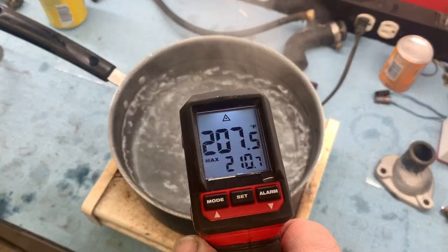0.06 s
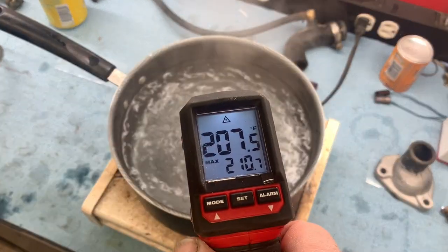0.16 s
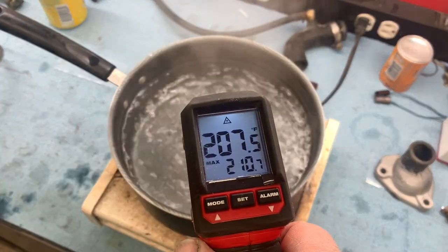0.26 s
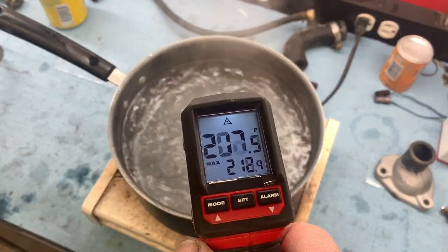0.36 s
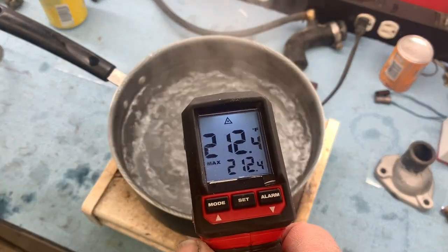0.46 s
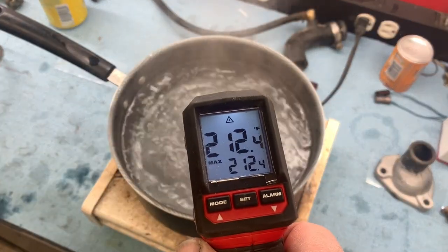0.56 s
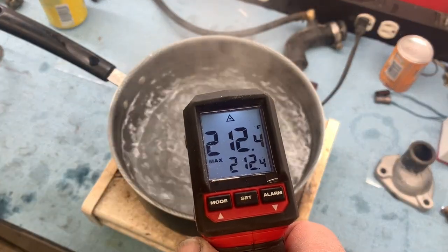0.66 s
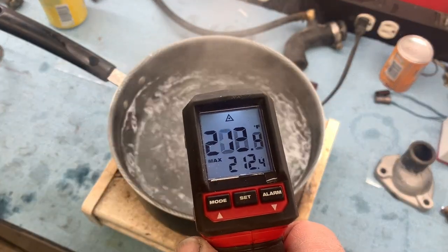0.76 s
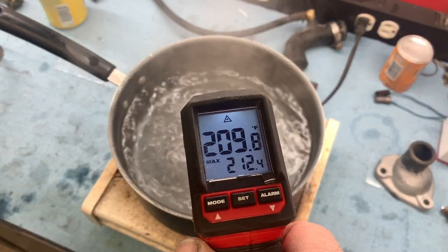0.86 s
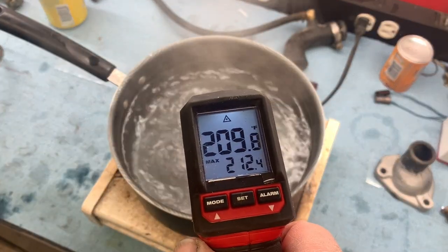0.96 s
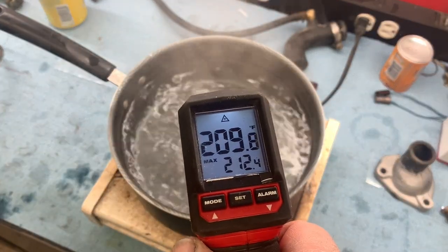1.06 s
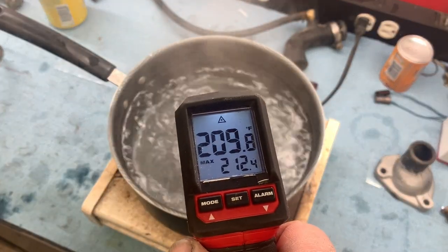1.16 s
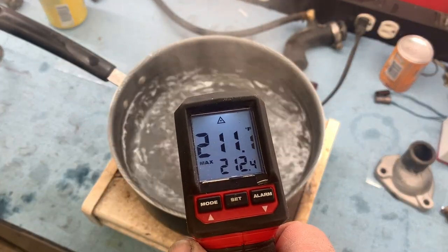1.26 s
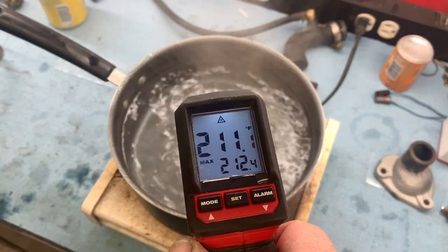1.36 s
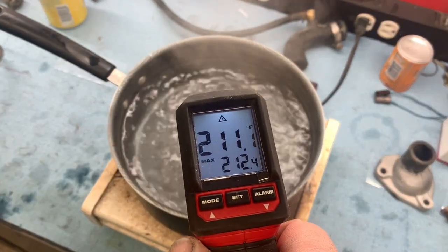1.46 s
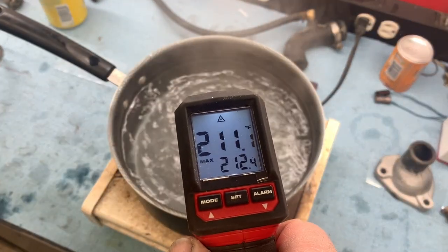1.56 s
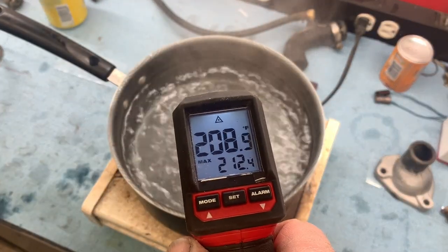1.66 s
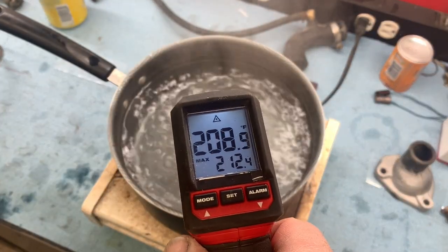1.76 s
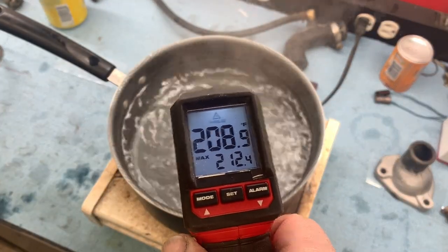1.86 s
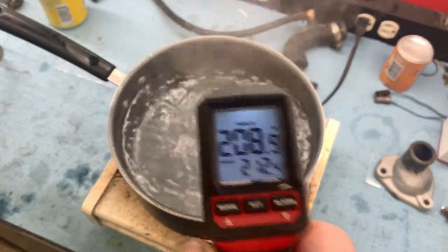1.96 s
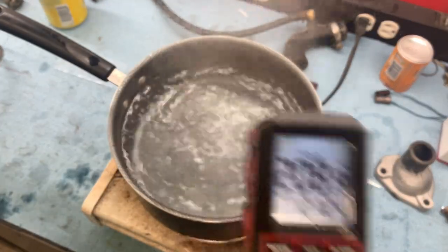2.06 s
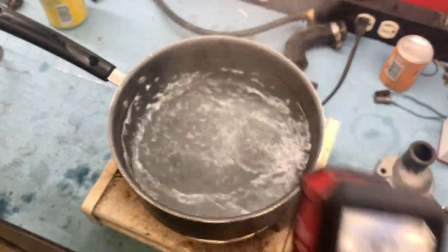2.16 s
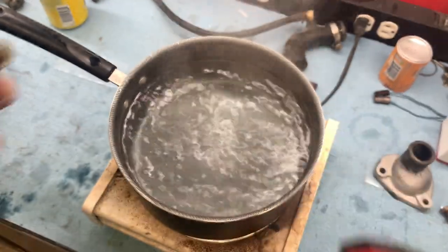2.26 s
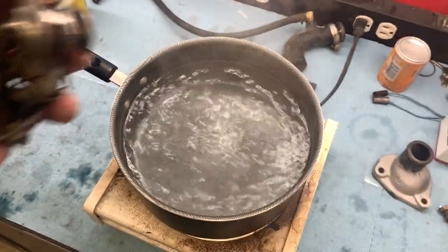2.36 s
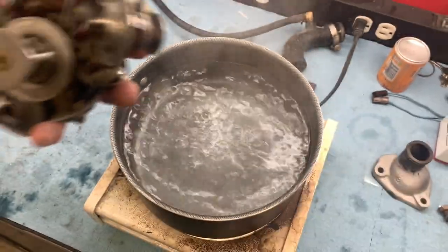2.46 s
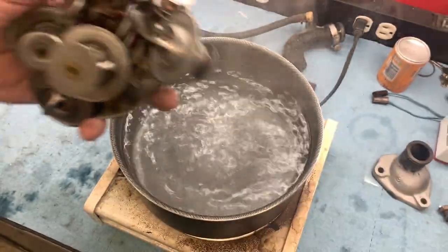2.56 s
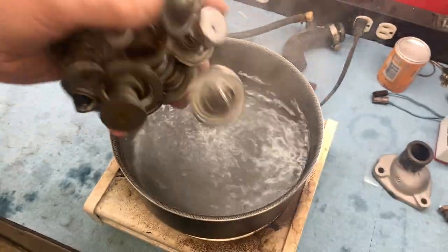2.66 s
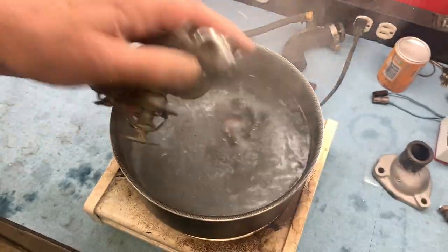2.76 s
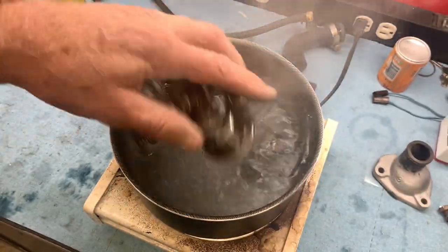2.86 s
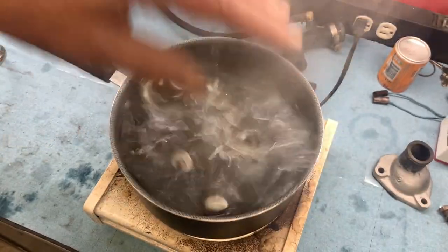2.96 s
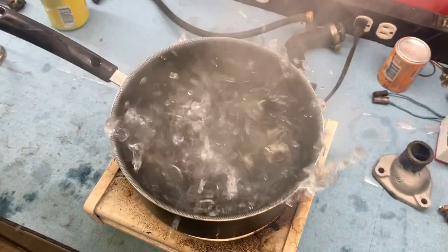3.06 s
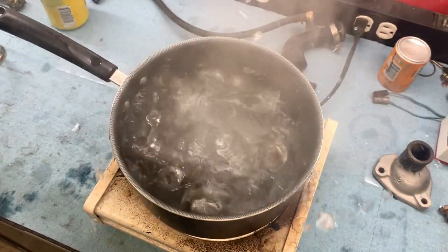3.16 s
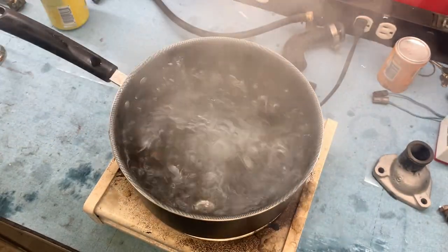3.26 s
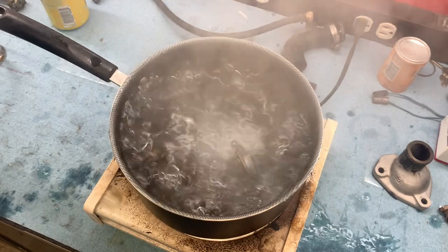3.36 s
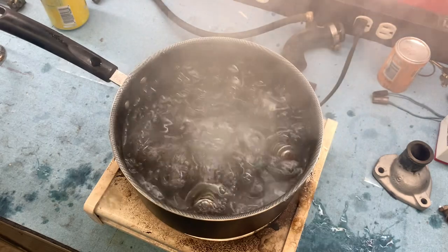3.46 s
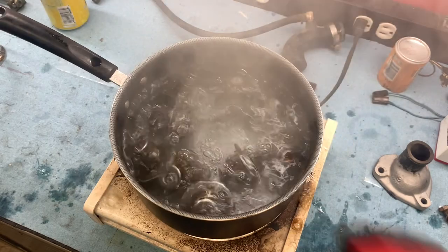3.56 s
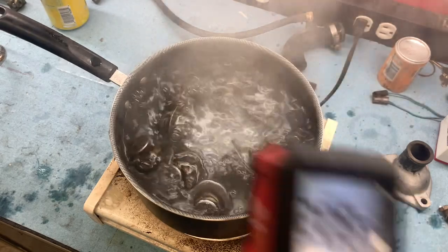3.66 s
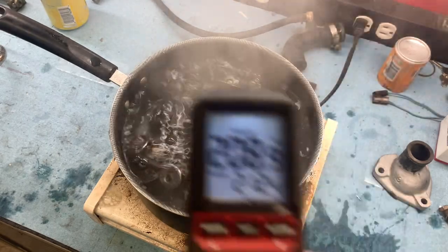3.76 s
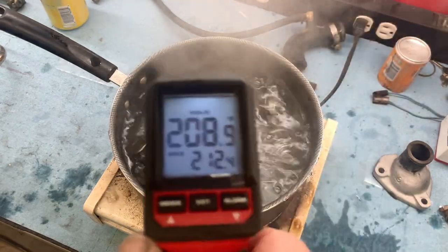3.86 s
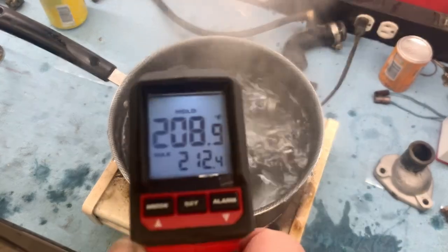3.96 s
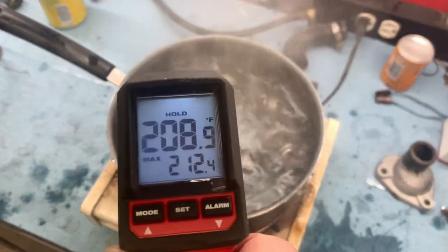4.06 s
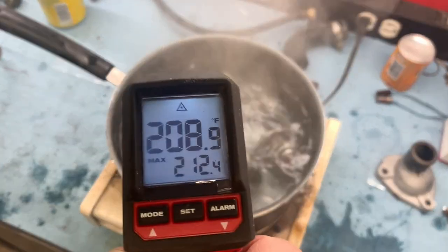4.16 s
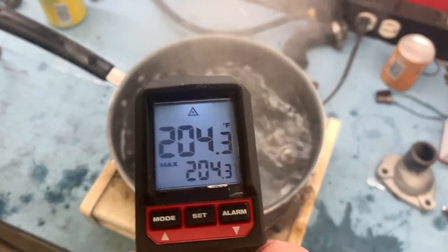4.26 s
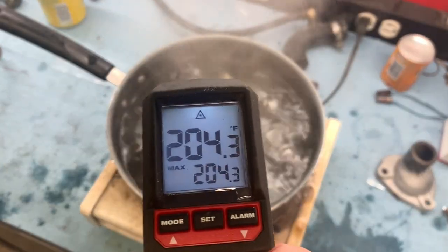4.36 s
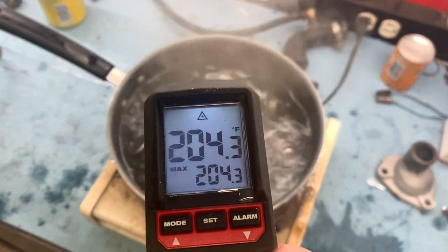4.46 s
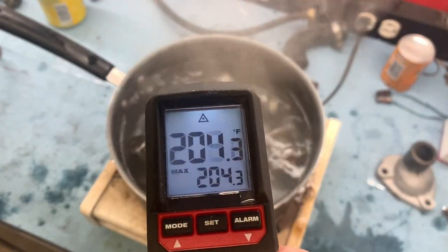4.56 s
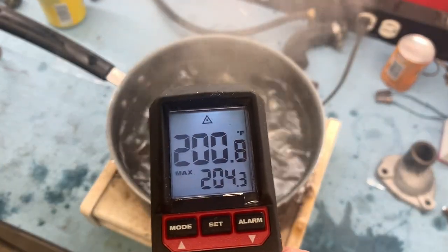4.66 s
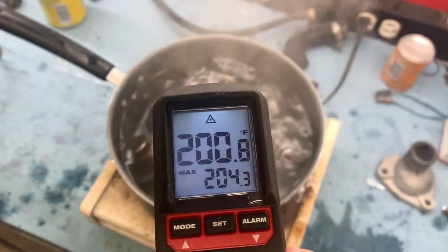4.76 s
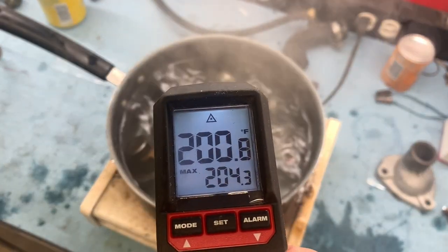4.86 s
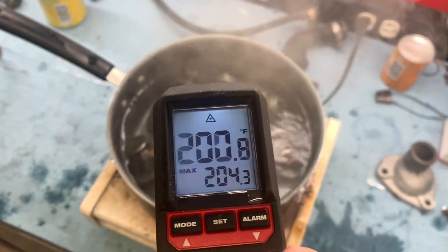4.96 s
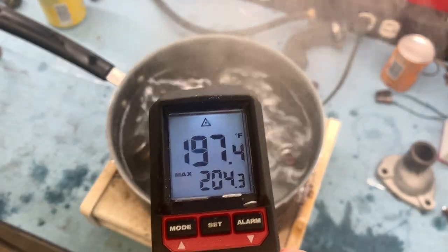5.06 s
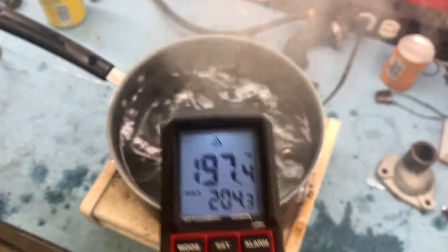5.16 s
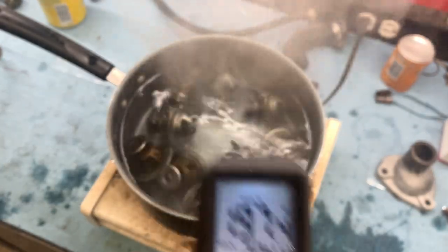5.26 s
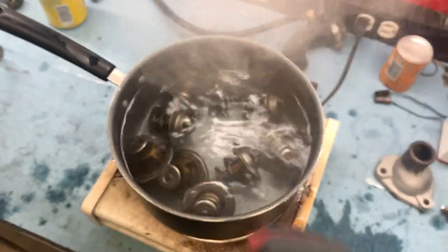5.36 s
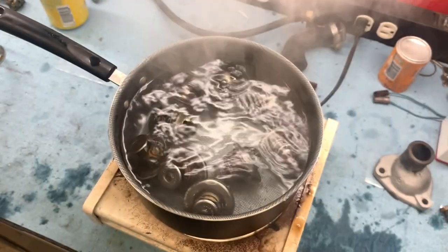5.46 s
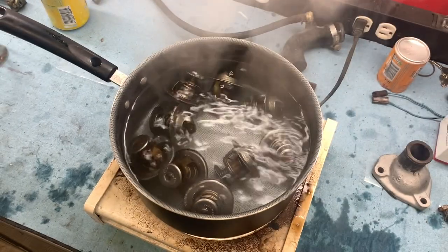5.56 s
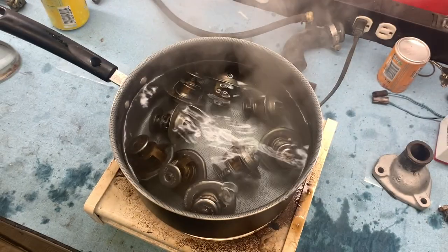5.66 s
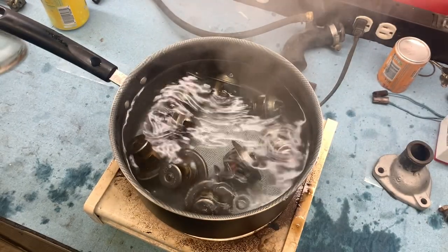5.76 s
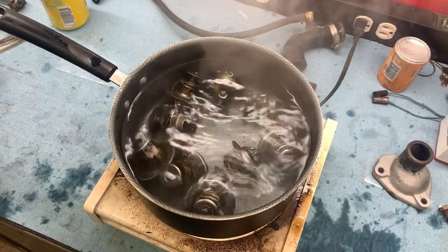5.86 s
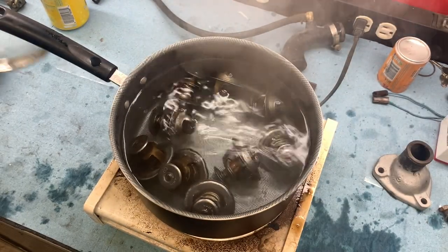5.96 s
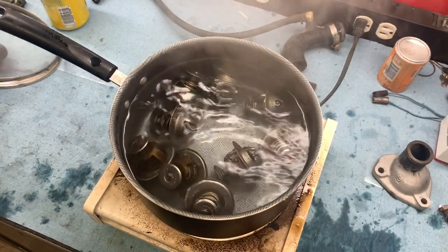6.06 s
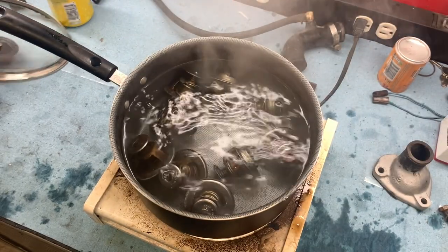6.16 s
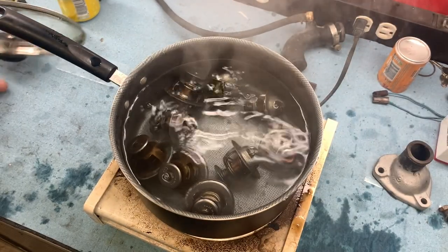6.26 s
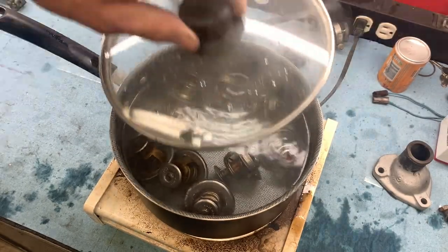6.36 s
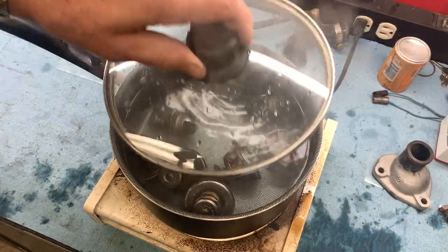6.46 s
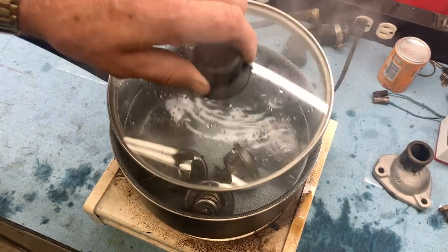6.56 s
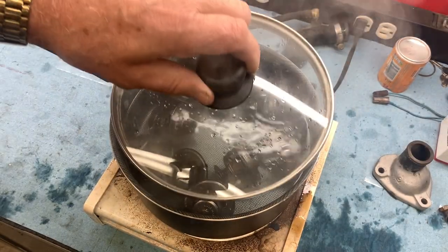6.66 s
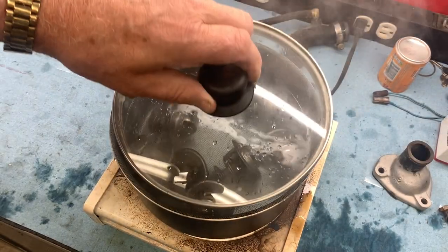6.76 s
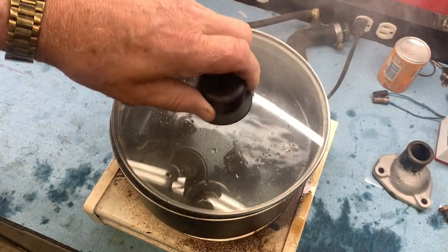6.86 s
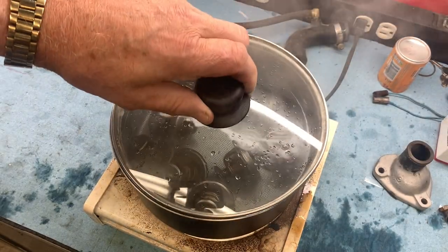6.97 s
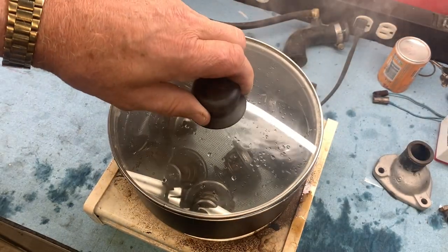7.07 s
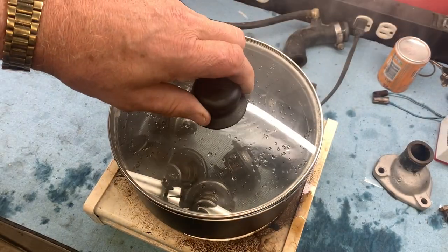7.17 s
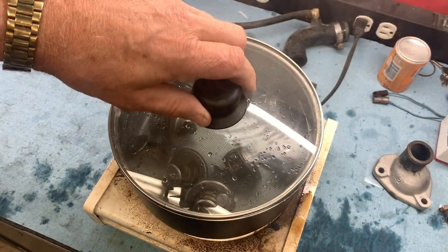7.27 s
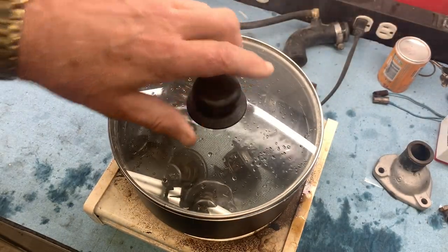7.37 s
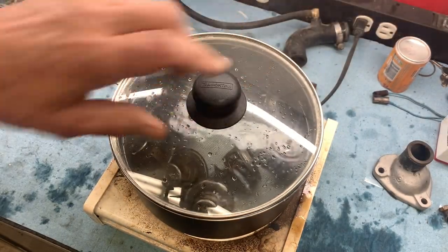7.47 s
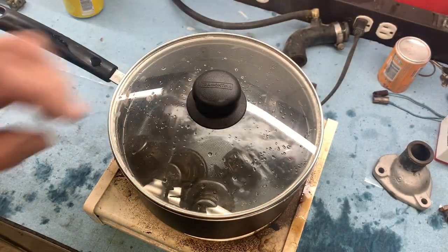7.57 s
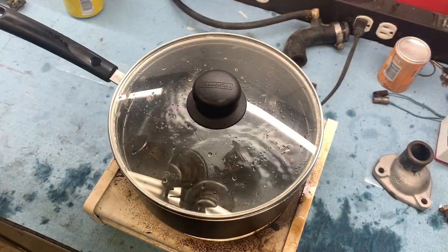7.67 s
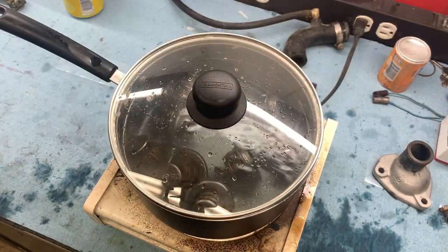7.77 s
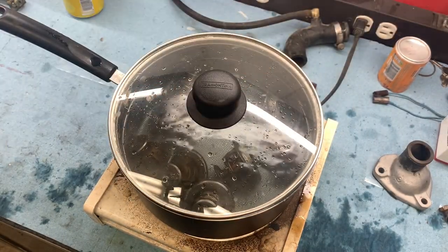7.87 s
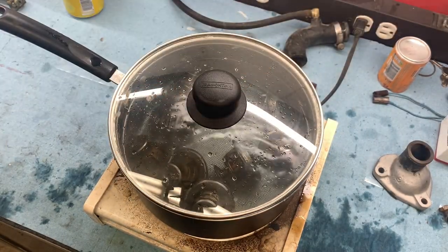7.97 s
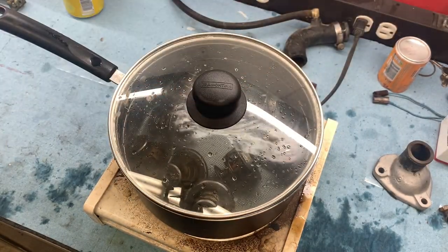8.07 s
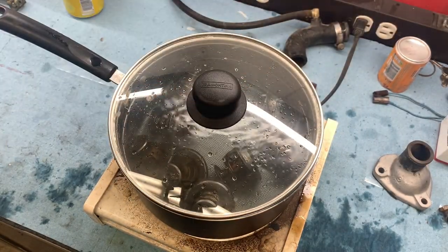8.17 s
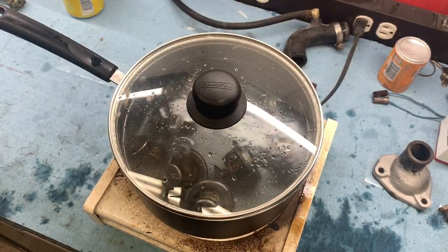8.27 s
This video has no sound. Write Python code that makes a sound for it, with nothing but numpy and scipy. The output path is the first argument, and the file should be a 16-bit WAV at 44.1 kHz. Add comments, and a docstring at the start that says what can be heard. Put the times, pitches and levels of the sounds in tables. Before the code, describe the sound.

A saucepan simmers softly on a hot plate, close by, with an uneven low throb over workshop ventilation and a faint electrical hum. A plastic thermometer trigger clicks at about 1.8 seconds. From 2.3 seconds metal parts rub and clink in a hand. Between 2.8 and 3.2 they splash into the water and clatter on the pan's bottom, the loudest moment, with plops, a gurgle and a fizz that slowly fades. The thermometer clicks again near 4 and 5.3 seconds. The pan's wall rings thinly, steam bubbles collapse in small rasps, and low glugs follow from 5.5 to 6.2. Spilled water sizzles on the plate from around 5.4 seconds. At 6.1 a glass lid scrapes off the bench with a brief ring, then knocks dully onto the pan at about 7. Droplets spit and sputter until the end, just after 8 seconds.

```python
"""In a workshop, a saucepan simmers and throbs on a hot plate, close under a hand-held phone.
A thermometer's plastic trigger clicks. Metal parts clink in a hand and drop into the pan, where
the air they drag under plops, gurgles and fizzes. Steam bubbles collapse and glug, and water that
slops over hisses and spits on the plate. A glass lid is picked up from the bench and set on the pan.
Ventilation and a faint electrical hum go on behind it all."""
import sys
import numpy as np
from scipy import signal
from scipy.fft import rfft, irfft
from scipy.io import wavfile
from scipy.ndimage import uniform_filter1d

SR = 44100
rng = np.random.default_rng(int(sys.argv[2]) if len(sys.argv) > 2 else 0)


def to_wav(sig):
    """Store sig (one row per channel, or 1-D mono) as 16-bit WAV at the path in sys.argv[1].

    Samples outside -1..1 are clipped; the rate is SR.
    """
    pcm = np.clip(np.atleast_2d(sig), -1, 1) * 32767
    pcm = np.round(pcm).astype(np.int16)
    wavfile.write(sys.argv[1], SR, pcm.T)  # frames by channels


N = 366912
T = np.arange(N) / SR  # the time of every sample, in seconds
HIT_T = T[:SR // 2]  # half a second, for one short sound
FREQS_HZ = np.fft.rfftfreq(N, 1 / SR)


def undb(db):
    """Turn decibels into a number to multiply by."""
    return 10 ** (np.asarray(db) / 20)


def unit(x):
    """Scale a sound so its average strength (rms) is 1."""
    return x / np.sqrt(np.mean(x ** 2))


def curves(rows):
    """Join a table's points with straight lines through time, one curve for each value column."""
    times_s, *columns = np.transpose(rows)
    return [np.interp(T, times_s, column) for column in columns]


def add(track, start_s, sound):
    """Mix a sound into a track at the given time."""
    start = int(start_s * SR)
    track[start:start + len(sound)] += sound[:N - start]


def colour(x, points):
    """Shape a sound's bass and treble by (pitch_hz, level_db) points; the result has strength 1."""
    hz, db = np.transpose(points)
    freqs = np.fft.rfftfreq(len(x), 1 / SR) + 1
    gain = undb(np.interp(np.log(freqs), np.log(hz), db))
    return unit(irfft(rfft(x) * gain, len(x)))


def resonate(x, hz, width_hz):
    """Make a sound ring at one pitch; a narrower width rings longer."""
    hz = min(hz, SR / 2 - 1000)
    sharpness = hz / min(width_hz, SR / np.pi)
    return signal.lfilter(*signal.iirpeak(hz, sharpness, fs=SR), x)


def wander(per_s):
    """A smooth random wobble of strength 1 that heads for a new value per_s times a second."""
    step = max(int(SR / per_s), 1)
    held = np.repeat(rng.standard_normal(N // step + 1), step)[:N]
    return unit(uniform_filter1d(uniform_filter1d(held, step), step))


def swell(peak_s, rise_s, fade_s):
    """A level that grows to 1 at peak_s and dies away; with an endless fade it stays at 1."""
    return np.exp(np.minimum((T - peak_s) / rise_s, (peak_s - T) / fade_s))


def pops(per_s, spread_db):
    """Tiny clicks of uneven size at random moments, like bursting bubbles."""
    size = undb(spread_db * np.minimum(rng.exponential(size=N), 2 * np.pi))
    happens = rng.random(N) < per_s / SR
    return unit(happens * size * rng.choice([-1, 1], N))


def grit(spread_db):
    """Rough noise for one short sound, made of grains under a millisecond long."""
    grain_samples = 32
    sizes = undb(spread_db * rng.uniform(-0.79, 1, len(HIT_T) // grain_samples + 1))
    return np.repeat(sizes, grain_samples)[:len(HIT_T)] * rng.standard_normal(len(HIT_T))


def blows(rows, tones, thud_colour, crack_colour, thud_db, thud_s, ring_db):
    """Each blow thuds, cracks and rings the object; a tone falls by 60 dB over its ring_s."""
    out = np.zeros(N)
    hz, tone_db, ring_s = np.transpose(tones)[:, :, None]
    for start_s, body_db, crack_db, crack_s in rows:
        # every spot that is struck rings a little differently
        spot, detune, side = rng.standard_normal((3, len(hz), 1))
        gain = undb(tone_db + 1.1 * spot) * np.sign(side)
        waves = np.sin(2 * np.pi * hz * (1 + 0.012 * detune) * HIT_T)
        fade = np.exp(-np.log(1000) * HIT_T / ring_s)
        ring = np.sum(gain * waves * fade, axis=0) / np.linalg.norm(gain)
        thud = colour(rng.standard_normal(len(HIT_T)), thud_colour) * np.exp(-HIT_T / thud_s)
        crack = colour(grit(spread_db=8.0), crack_colour) * np.exp(-HIT_T / crack_s)
        body = undb(ring_db) * ring + undb(thud_db) * thud
        add(out, start_s, undb(body_db) * body + undb(crack_db) * crack)
    return out


# The deep rush of the ventilation: pitch_hz, level_db
VENT_COLOUR = [(20, -3), (50, 8), (80, 6), (130, -5), (250, -12), (500, -12), (720, -15), (1050, -15.5),
               (1700, -47), (4000, -47), (16000, -98)]
# The hum of the electricity supply: pitch_hz, level_db
HUM_TONES = [(120, -60), (240, -65.5)]

def workshop():
    """Ventilation rushes steadily over an unsteady rumble, and the electricity supply hums."""
    air = colour(rng.standard_normal(N), VENT_COLOUR)
    rumble = signal.sosfilt(signal.butter(2, 150, fs=SR, output="sos"), air)
    steady = signal.sosfilt(signal.butter(2, 150, "high", fs=SR, output="sos"), air)
    middle = rumble * undb(3.8 * wander(per_s=9.3)) - steady
    side_colour = [(20, -34), (60, -2.5), (200, -20), (500, -18.5), (1000, -26.5), (2000, -38),
                   (16000, -57)]
    sides = colour(rng.standard_normal(N), side_colour) * np.array([[1], [-1]])  # opposite in each ear
    hum = sum(np.sqrt(2) * undb(db) * np.sin(2 * np.pi * hz * T) for hz, db in HUM_TONES)
    return undb(-54) * middle + hum + undb(-60.5) * sides


# The note of the pan shaking on the plate: time_s, pitch_hz
SHAKE_PITCH = [(.7, 65), (1.6, 63.5), (2.2, 65.5), (3.6, 63.6), (4.3, 62), (5.7, 60)]
# How the shaking grows and eases: time_s, level_db
SHAKE_LEVEL = [(0.0, -39), (0.63, -33), (1.32, -52.5), (1.81, -35), (2.15, -42), (3.24, -38), (3.29, -32),
               (4.17, -40), (4.22, -64), (4.47, -41), (4.61, -65), (4.73, -41.5), (5.23, -54),
               (5.63, -39.5), (5.84, -49.5), (7.71, -55.5), (8.27, -45)]

def throb():
    """The boil shakes the pan at a low, slightly wandering pitch, with a weak tone an octave up."""
    hz, = curves(SHAKE_PITCH)
    level_db, = curves(SHAKE_LEVEL)
    phase = 2 * np.pi * np.cumsum(hz + 0.83 * wander(per_s=9.4)) / SR
    tone = unit(np.sin(phase) + undb(-28) * np.sin(2 * phase))
    return tone * undb(level_db - 1 + 0.26 * wander(per_s=17))


PLUNGE_S, PLUNGE_RISE_S = 2.862, 0.096  # when the parts stir the water most, and the build-up
# The pitches at which the open pan and its air ring: pitch_hz, width_hz, level_db
OPEN_PAN_TONES = [(361.3, 14, 12), (495.7, 43, 10), (678, 64, -5), (1019, 150, 4), (1212, 33, -6.5),
                  (1690, 720, -21.5)]

def simmer():
    """Coarse bubbles ring the pan; the falling parts add a short churn and a long slosh."""
    bubbles = pops(per_s=1200, spread_db=2.6) * undb(wander(per_s=25))
    ringing = unit(sum(undb(db) * resonate(bubbles, hz, width) for hz, width, db in OPEN_PAN_TONES))
    resting = undb(-65.5)
    churn = undb(-42.5) * swell(PLUNGE_S, PLUNGE_RISE_S, fade_s=0.24)
    slosh = undb(-54.5) * swell(PLUNGE_S, PLUNGE_RISE_S, fade_s=5.5)
    return ringing * np.hypot(resting, churn + slosh)


# The bass and treble of fine bubbles: pitch_hz, level_db
FINE_BUBBLE_COLOUR = [(200, 2), (700, -2), (1500, -7.5), (3000, -3), (4500, -1.5), (6000, -3), (8000, 1),
                      (11000, -0.5), (14800, 5), (16000, -7)]
# Fine bubbles rising off the sunken parts: time_s, level_db
FIZZ_LEVEL = [(3.2, -56), (3.23, -37), (3.97, -46), (4.34, -44), (4.8, -54), (5.3, -62), (6.3, -56),
              (8.3, -69)]

def fizz():
    """Fine bubbles burst: faintly at first, then in a spray as the parts land, then off the parts."""
    bubbles = colour(pops(per_s=13000, spread_db=1.8), FINE_BUBBLE_COLOUR)
    resting = undb(-76.5)
    spray = undb(-40) * swell(PLUNGE_S, PLUNGE_RISE_S, fade_s=0.23)
    level_db, = curves(FIZZ_LEVEL)
    off_parts = undb(level_db) * swell(FIZZ_LEVEL[0][0], rise_s=0.05, fade_s=np.inf)
    return bubbles * (resting + spray + off_parts)


def spurts(per_s, count):
    """The power of droplets flashing to steam in turn, each with its own size and length; average 1."""
    progress = np.cumsum(per_s * undb(3 * wander(per_s=40))) / SR  # goes up by 1 for each droplet
    size, length = rng.random((count, 2))[progress.astype(int) % count].T
    cutoff = np.exp(-(progress % 1 / (.15 + .4 * length)) ** 4)
    power = undb(8 * size) ** 2 * cutoff
    return power / np.mean(power)


# The bright hiss of water on hot metal: pitch_hz, level_db
HISS_COLOUR = [(1000, -6), (3200, 1.5), (5400, -2), (5900, 3.5), (8300, 4), (10300, -9), (11100, 3),
               (12000, 11.5), (14800, 13.5), (16000, -1)]
# The hiss of the water that slops over: time_s, level_db
SLOP_LEVEL = [(4.6, -65), (5.25, -57.5), (5.47, -47.5), (5.98, -43.5), (6.19, -43), (6.32, -43.5),
              (6.335, -60), (6.455, -53), (6.48, -43), (6.7, -45), (6.98, -50), (7.27, -49.5),
              (7.45, -54.5), (8.3, -58)]
# The hiss breaks into slower spurts as the plate dries: time_s, share_in_spurts (0-1), spurts_per_s
SPURT_PATTERN = [(0, .3, 60), (3.3, .1, 120), (5.2, .5, 100), (6.1, .55, 80), (6.55, .45, 50),
                 (6.9, .75, 30), (7.5, .85, 28)]

def sizzle():
    """The hot plate hisses faintly, then sizzles in spurts when water slops onto it."""
    hiss = colour(pops(per_s=13000, spread_db=1.8), HISS_COLOUR)
    resting = undb(-71)
    level_db, = curves(SLOP_LEVEL)
    slop = undb(level_db) * swell(SLOP_LEVEL[0][0], rise_s=0.05, fade_s=np.inf)
    share, per_s = curves(SPURT_PATTERN)
    sputter = np.sqrt(1 - share + share * spurts(per_s, count=900))
    return hiss * np.hypot(resting, slop) * sputter


# The two pitches at which the pan's wall rings: pitch_hz, width_hz
WALL_TONES = [(1040, 115), (2275, 100)]
# How strongly each one sings: time_s, lower_tone_db, upper_tone_db
WALL_LEVELS = [(0, -75, -70), (1.3, -75, -69.5), (2.2, -72, -67.5), (2.5, -75, -74), (3.3, -64.5, -66.5),
               (4.6, -62, -64), (5.7, -58, -60), (6.2, -62, -63), (6.5, -75, -77)]

def singing_wall():
    """Bubbles on the bottom keep the wall ringing with two thin tones, each flickering on its own."""
    out = np.zeros(N)
    for (hz, width), db in zip(WALL_TONES, curves(WALL_LEVELS)):
        bubbles = pops(per_s=1200, spread_db=2.2) * undb(2.2 * wander(per_s=25))
        out += undb(db) * unit(resonate(resonate(bubbles, hz, width), hz, width))
    return out


# The ring of the thermometer's plastic case: pitch_hz, level_db, ring_s
CASE_TONES = [(1125, -1, .02), (1280, 6, .022), (1700, -2, .022), (2100, -3, .02), (3300, -11, .012),
              (4100, -1, .025), (4950, -2, .04)]
# Its trigger and case clicking: start_s, body_db, snap_db, snap_fade_s
CLICKS = [(1.8405, -52, -48, 0.0017), (1.8525, -39, -33.5, 0.0019), (3.956, -41, -62, 0.0032),
          (5.2743, -36.5, -49, 0.0016)]

def thermometer():
    """A plastic trigger snaps and rings the hollow case."""
    thud = [(100, -18), (350, 8), (700, -1), (1250, -7), (2500, -0.5), (6000, -13)]
    snap = [(500, -23), (2500, 2), (4400, 22), (5600, 15), (8000, 4), (10000, -14), (16000, -18)]
    return blows(CLICKS, CASE_TONES, thud, snap, thud_db=-0.5, thud_s=0.0071, ring_db=4)


def rub():
    """Metal parts grate against each other in the hand, louder as they near the pan."""
    grating = [(500, -43), (3500, 6), (7000, -5), (10000, 3), (13000, -1), (16000, -4)]
    grains = colour(pops(per_s=1900, spread_db=-8), grating)
    return grains * undb(-53.5) * swell(peak_s=2.584, rise_s=0.14, fade_s=0.093)


# Metal parts touching in the hand: start_s, level_db, pitch_hz, fade_s
HAND_CLINKS = [(2.33, -40, 9800, 0.0055), (2.582, -48, 3730, 0.011), (2.637, -23.5, 10800, 0.0031),
               (2.64, -27.5, 2160, 0.0016), (2.744, -18.5, 11000, 0.00087)]

def clinks():
    """Small hard parts knock together: a sharp snap with a faint, short tail."""
    out = np.zeros(N)
    for start_s, db, hz, fade_s in HAND_CLINKS:
        snap = unit(resonate(rng.standard_normal(len(HIT_T)), hz, width_hz=0.93 * hz))
        tail = undb(-13.5) * np.exp(-HIT_T / (6 * fade_s))
        add(out, start_s, undb(db) * snap * (np.exp(-HIT_T / fade_s) + tail))
    return out


# The ring of the pan when it is struck: pitch_hz, level_db, ring_s
STRUCK_PAN_TONES = [(130.4, -7.5, 0.28), (206, -8, 0.22), (347.4, 1, 0.14), (383, -2, 0.093),
                    (504, 3, 0.15), (531.4, -4, 0.2), (691, -7.5, 0.11), (843, 0.5, 0.11), (1025, 5, 0.055),
                    (1150, -27, 0.059), (1320, -23, 0.11), (1473, -13, 0.1), (1920, -16, 0.07),
                    (2263, -5.5, 0.096), (2860, -13, 0.056), (4340, -17, 0.07)]
# Parts landing in the pan: start_s, body_db, splash_db, splash_fade_s
LANDINGS = [(2.777, -20.5, -13.5, 0.0059), (2.783, -21, -18, 0.0036), (2.856, -38.5, -27.5, 0.01),
            (2.9175, -23, -12, 0.0037), (2.926, -27, -9.5, 0.0037), (2.943, -27, -13.5, 0.0061),
            (2.950, -22, -16.5, 0.023), (2.975, -32, -20, 0.012), (2.9975, -24, -13.5, 0.01),
            (3.027, -26.5, -27, 0.04), (3.053, -23.5, -14, 0.0028), (3.066, -31.5, -26.5, 0.01),
            (3.102, -28.5, -32, 0.015), (3.159, -32, -34.5, 0.007)]

def falling_parts():
    """Metal parts slap the water and tumble onto the bottom of the pan."""
    thud = [(60, -26), (140, 5), (240, -10.5), (350, -20), (520, 6), (1100, -4), (1600, -15),
            (2400, -19), (5000, -19)]
    splash = [(200, -34), (1200, 7.5), (2500, 13), (4500, 2), (7500, 9), (11000, 9.5), (14700, 6),
              (16000, 4.5)]
    return blows(LANDINGS, STRUCK_PAN_TONES, thud, splash, thud_db=3, thud_s=0.0078, ring_db=6.5)


def bubble(hz, db, swell_s):
    """One bubble swells and rings briefly, its pitch creeping up as it nears the surface."""
    age = HIT_T / swell_s
    pitch_hz = hz * (1 + 0.07 * np.tanh((age - 2) / 2))
    level = undb(db) * age * np.exp(1 - age)
    return level * np.sin(2 * np.pi * np.cumsum(pitch_hz) / SR)


# Pockets of air under the water: start_s, pitch_hz, level_db, swell_s
AIR_POCKETS = [(2.7768, 511, -7.5, 0.0022), (2.7815, 2277, -19, 0.0017), (2.784, 390, -13, 0.0018),
               (2.788, 144, -24, 0.0054), (2.885, 495, -26.5, 0.0038), (2.925, 482, -19.5, 0.0066),
               (2.926, 1046, -18.5, 0.0026), (2.949, 1030, -15.5, 0.0036), (2.950, 518, -16, 0.0045),
               (2.973, 1085, -16, 0.0047), (2.995, 606, -14.5, .002), (2.998, 1067, -11.5, 0.0019),
               (3.008, 176, -24.5, 0.0051), (3.027, 2267, -24, 0.0037), (3.052, 470, -15.5, 0.0023),
               (3.106, 388, -27, 0.0051), (3.162, 370, -26, 0.0079), (3.164, 1046, -39, 0.004),
               (3.257, 1040, -36.5, 0.0037), (5.252, 367, -39, 0.0019)]

def plops():
    """Air dragged under by the parts rings as single bubbles."""
    out = np.zeros(N)
    for start_s, hz, db, swell_s in AIR_POCKETS:
        add(out, start_s, bubble(hz, db, swell_s))
    return out


def gurgle(count):
    """Water closes over the parts and the trapped air breaks into bubbles of all sizes, ever weaker."""
    start_s, length_s = 2.93, 0.46
    start_db, fall_db_per_s = -21.5, 57
    low_hz, high_hz = 298, 1530
    out = np.zeros(N)
    for when, size in rng.random((count, 2)):
        delay_s = when * length_s
        hz = high_hz * (low_hz / high_hz) ** size  # bigger bubbles sound lower
        add(out, start_s + delay_s, bubble(hz, start_db - fall_db_per_s * delay_s, swell_s=1.36 / hz))
    return out


# Clusters of steam bubbles caving in: start_s, level_db
STEAM_CLUSTERS = [(4.755, -50), (4.881, -54), (5.022, -47), (5.365, -48.5), (5.615, -47.5), (5.751, -49)]

def collapses():
    """Steam bubbles collapse in the cooled water with a short rasp that rings the pan's wall."""
    rasp_colour = [(300, -8), (1000, -0.5), (3000, -2), (7000, -3.5), (10000, -10), (16000, -9)]
    swell_s = 0.0038
    age = HIT_T / swell_s
    out = np.zeros(N)
    for start_s, db in STEAM_CLUSTERS:
        rasp = colour(grit(spread_db=9), rasp_colour)
        ring = unit(sum(resonate(rasp, hz, width) for hz, width in WALL_TONES))
        add(out, start_s, undb(db) * (rasp + undb(-1) * ring) * age * np.exp(1 - age))
    return out


# Big steam bubbles: start_s, pitch_hz, level_db, swell_s, churn_db, churn_swell_s
BIG_BUBBLES = [(5.462, 162, -39.5, 0.0044, -48, 0.014), (5.588, 131, -30.5, 0.0051, -45, 0.029),
               (5.799, 114, -43, 0.0096, -50, .016), (5.99, 143, -33.5, 0.0082, -49, 0.033),
               (6.151, 150, -35.5, 0.0043, -45, 0.015)]
# The low sound of churning water: pitch_hz, level_db
CHURN_COLOUR = [(40, -26), (85, 0), (170, -1), (260, -17), (500, -17), (2000, -38), (16000, -70)]

def glugs():
    """A steam bubble heaves up and breaks apart; the water churns roughly after it."""
    out = np.zeros(N)
    for start_s, hz, db, swell_s, churn_db, churn_swell_s in BIG_BUBBLES:
        age = HIT_T / churn_swell_s
        churn = colour(rng.standard_normal(len(HIT_T)), CHURN_COLOUR) * age * np.exp(1 - age)
        add(out, start_s, bubble(hz, db, swell_s) + undb(churn_db) * churn)
    return out


# The lid scraping off the bench: start_s, body_db, scrape_db, scrape_fade_s
BENCH_SCRAPES = [(6.134, -41, -28.5, 0.0074), (6.154, -38, -28, 0.0049), (6.166, -40, -36, 0.0037)]
# The lid ringing freely: pitch_hz, level_db, ring_s
FREE_LID_TONES = [(500, -1, 0.13), (716, -3, .12), (790, 1, .07), (867, -5, .27), (925, -7, .3),
                  (972, -6, .38), (1030, -8, .3), (1230, -3, .12), (1420, 2, 0.08)]
# The lid meeting the pan's rim: start_s, body_db, scrape_db, scrape_fade_s
RIM_KNOCKS = [(6.63, -54, -51, 0.0088), (6.883, -43, -65, .004), (7.025, -35, -34.5, 0.0037),
              (7.058, -27.5, -34, 0.0059), (7.068, -39, -42.5, 0.007)]
# The lid's duller ring on the pan: pitch_hz, level_db, ring_s
SEATED_LID_TONES = [(130, 0, 0.27), (272, -2, 0.22), (366, 4.5, 0.17), (521, 7, 0.12), (602, 5, 0.11),
                    (842, -2, 0.075), (1200, 3, 0.058), (1370, -5, 0.042), (2100, -20, .08)]

def lid():
    """The glass lid rings as it leaves the bench; muffled by the hand, it knocks dully onto the pan."""
    thud = [(40, -10), (130, 6), (270, 13.5), (800, -1), (1300, -0.5), (1800, -48), (5000, -41)]
    scrape = [(300, -5), (1000, 14), (3000, 11.5), (6000, 5), (10000, 2.5), (16000, 1)]
    lifted = blows(BENCH_SCRAPES, FREE_LID_TONES, thud, scrape, thud_db=-14, thud_s=0.028, ring_db=2)
    seated = blows(RIM_KNOCKS, SEATED_LID_TONES, thud, scrape, thud_db=-2.5, thud_s=0.018, ring_db=3)
    return lifted, seated


# The bright snap of a droplet: pitch_hz, level_db
DROPLET_COLOUR = [(500, -12), (1400, -2), (3000, -5), (7000, 0), (10000, 2), (12500, 6), (15000, 6),
                  (16000, 4)]
# The loudest droplets on the hot plate: start_s, snap_db, hiss_db, hiss_length_s
DROPLETS = [(6.293, -37, -39, 0.0052), (6.353, -46, -44.5, 0.019), (6.462, -34, -40, 0.012),
            (7.011, -39, -44, .008), (7.348, -31, -46, 0.0054), (7.408, -46, -44.5, 0.014),
            (7.533, -32.5, -47, 0.006), (7.54, -35, -48, .005), (7.628, -32.5, -48, 0.029),
            (7.696, -39.5, -46, 0.014), (7.763, -27, -44, 0.012), (7.798, -41, -44.5, 0.015),
            (7.828, -38, -48.5, 0.14), (7.989, -46, -42.5, 0.014), (8.038, -42, -46, 0.0076),
            (8.068, -38, -45.5, 0.013), (8.109, -41, -49, 0.005)]

def spits(snap_fade_s=.0013):
    """A droplet snaps on hot metal, crackles for a moment and is gone."""
    out = np.zeros(N)
    for start_s, snap_db, hiss_db, hiss_length_s in DROPLETS:
        snap = colour(rng.standard_normal(len(HIT_T)), DROPLET_COLOUR) * np.exp(-HIT_T / snap_fade_s)
        hiss = colour(grit(spread_db=6.5), HISS_COLOUR) * np.exp(-(HIT_T / hiss_length_s) ** 4)
        add(out, start_s, undb(snap_db) * snap + undb(hiss_db) * hiss)
    return out


def room(x, ring_s, echo_db):
    """The bench and walls answer with a short echo, a little different on the left and right."""
    middle_colour = [(70, -16), (160, -6), (1000, -1), (2200, 3), (3500, 0), (6500, -2), (9500, -13),
                     (16000, -7)]
    side_colour = [(70, -20), (140, -14), (280, -4), (1000, -6), (2500, -2), (6000, -1), (10000, -1),
                   (13000, -5), (16000, -5)]
    middle = colour(rng.standard_normal(len(HIT_T)), middle_colour)
    side = colour(rng.standard_normal(len(HIT_T)), side_colour)
    fade = np.exp(-np.log(1000) * HIT_T / ring_s) * (1 - np.exp(-HIT_T / 0.0044))
    tails = np.array([middle + side, middle - side]) * fade / np.linalg.norm(fade)
    return undb(echo_db) * signal.fftconvolve(x[None], tails, axes=1)[:, :N]


def microphones(x, left_lead_rad, left_louder_db):
    """Two microphones differ in timing and level, and catch shifting bounces off the moving water."""
    bounce_colour = [(100, -20), (1000, -6), (1800, 1), (3000, -1), (4500, 3), (8000, -2), (9500, -20),
                     (11200, -2), (13000, -12), (15000, -3)]
    hz, db = np.transpose(bounce_colour)
    bounce = irfft(rfft(x) * undb(np.interp(FREQS_HZ, hz, db)), N)
    delays_s = rng.uniform(.0004, .005, size=5)
    scatter = undb(-12) * sum(np.roll(bounce, int(s * SR)) * wander(per_s=150) for s in delays_s)
    left = irfft(rfft(x + scatter) * np.exp(1j * left_lead_rad) * undb(left_louder_db / 2), N)
    right = irfft(rfft(x - scatter) * undb(-left_louder_db / 2), N)
    return np.array([left, right]) * undb(2)


# How the phone's two microphones hear the pan: pitch_hz, left_lead_rad, left_louder_db
PAN_LEFT_RIGHT = [(0, 0, 1), (500, -.6, -.5), (1100, -.1, 0), (2250, -1, 1), (2900, -2.8, 1),
                  (3900, -2.9, 2.5), (5300, -4.8, 4.5), (6200, -6.3, 1), (7200, -5.2, -1), (8100, -4.3, 0),
                  (9200, -3.2, 0), (10200, -3, 0), (12500, -.1, 0), (14100, .1, 0), (15700, 3, 0)]

def scene():
    """Everything on the bench, heard directly and through the room."""
    lifted, seated = lid()
    pan = simmer() + fizz() + sizzle() + thermometer() + rub() + clinks() + falling_parts()
    pan += plops() + gurgle(count=30) + collapses() + glugs() + spits() + seated
    wall = singing_wall()
    shaking = throb() * undb(np.array([[.9], [-.9]]))  # a little louder on the left
    hz, lead_rad, louder_db = np.transpose(PAN_LEFT_RIGHT)
    direct = microphones(pan, np.interp(FREQS_HZ, hz, lead_rad), np.interp(FREQS_HZ, hz, louder_db))
    bench_lead_s = .00018  # the lid on the bench reaches the left microphone first
    direct += microphones(lifted, 2 * np.pi * FREQS_HZ * bench_lead_s, left_louder_db=3)
    echo = room(pan + lifted + wall, ring_s=.2, echo_db=-11.5)
    return direct + echo + wall + shaking + workshop()


def record(dry):
    """The phone drops the deepest bass, rounds the loudest peaks and cuts the highest treble."""
    lowest_hz, highest_hz = 32, 15600
    thinned = signal.sosfilt(signal.butter(2, lowest_hz, "high", fs=SR, output="sos"), dry)
    rounded = np.tanh(thinned)
    return signal.sosfilt(signal.ellip(8, .2, 70, highest_hz, fs=SR, output="sos"), rounded)


dry = scene()
out = record(dry)
to_wav(out)
```